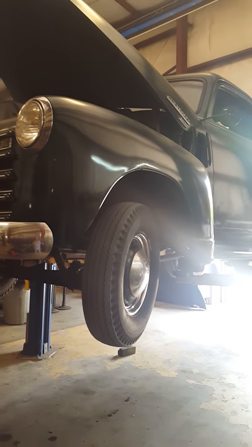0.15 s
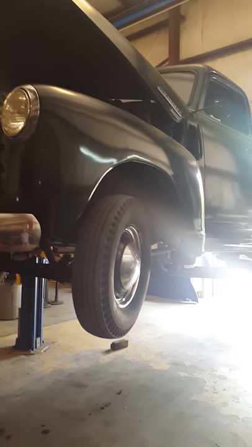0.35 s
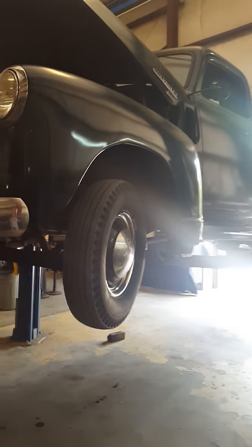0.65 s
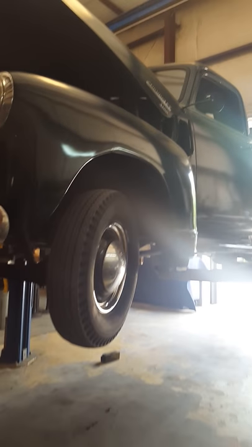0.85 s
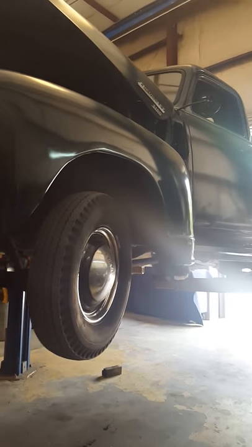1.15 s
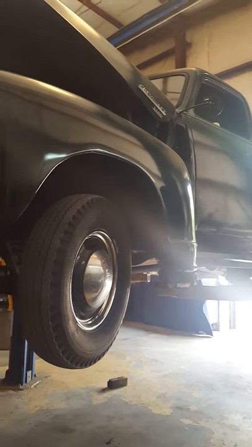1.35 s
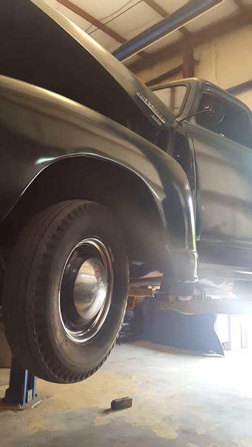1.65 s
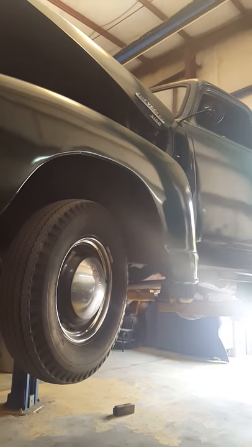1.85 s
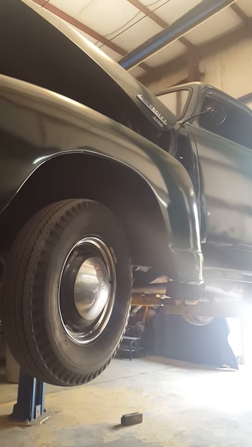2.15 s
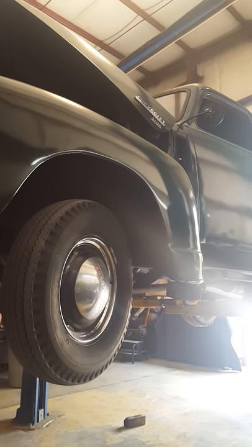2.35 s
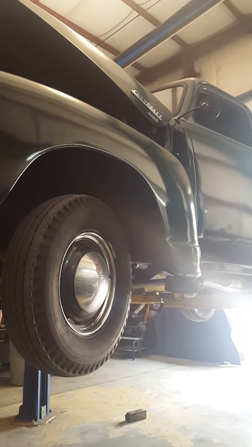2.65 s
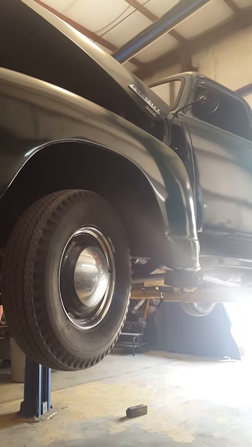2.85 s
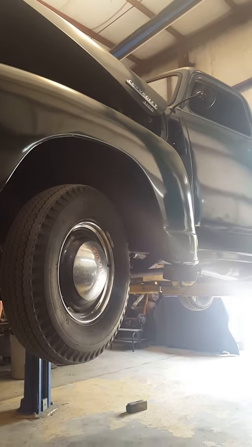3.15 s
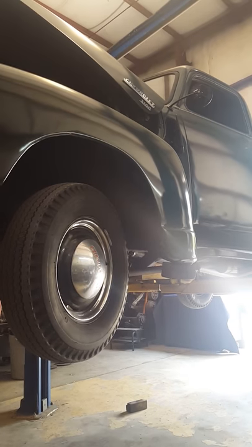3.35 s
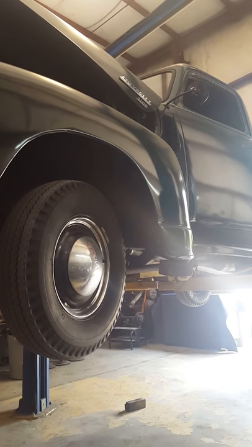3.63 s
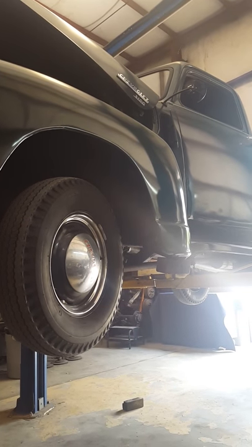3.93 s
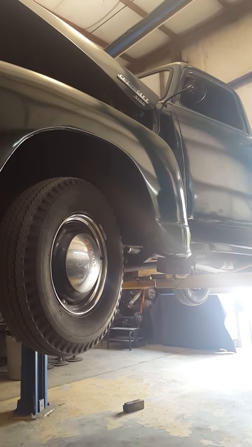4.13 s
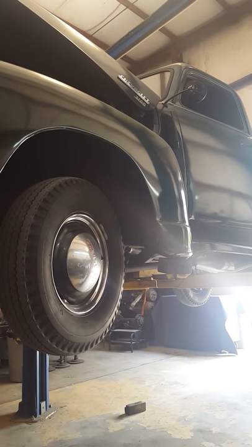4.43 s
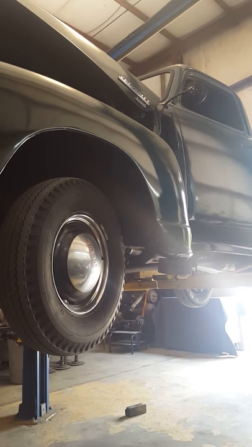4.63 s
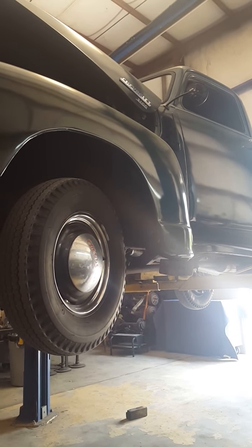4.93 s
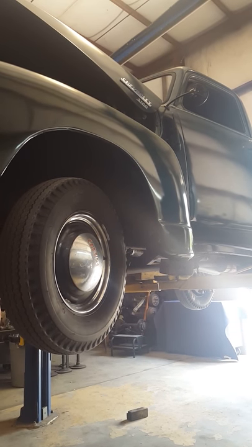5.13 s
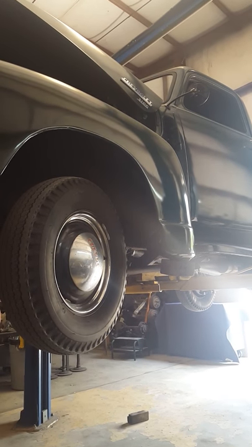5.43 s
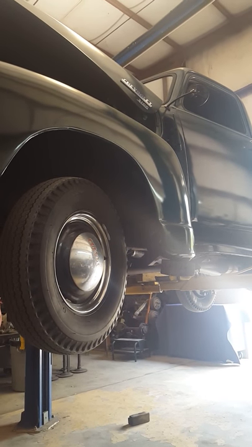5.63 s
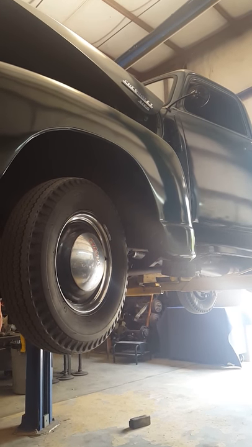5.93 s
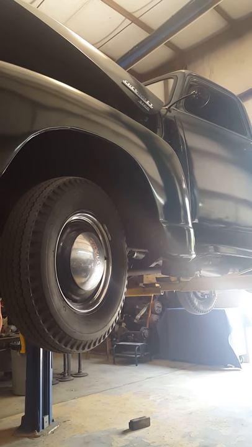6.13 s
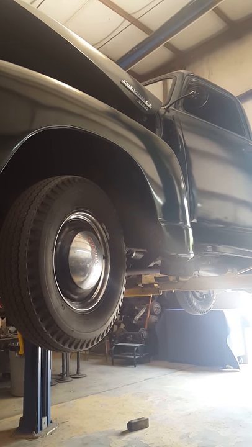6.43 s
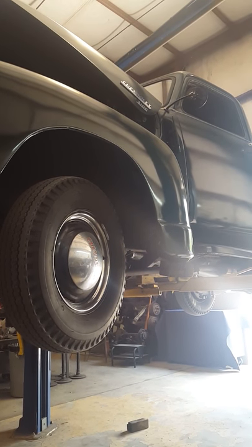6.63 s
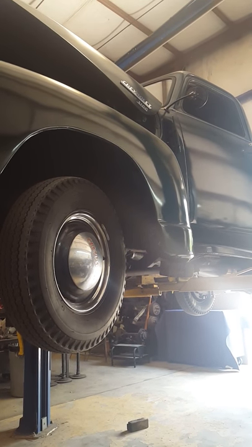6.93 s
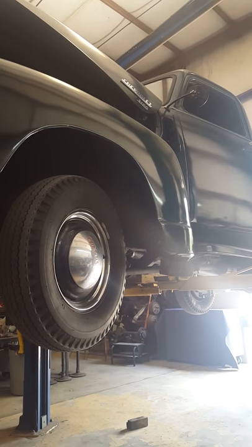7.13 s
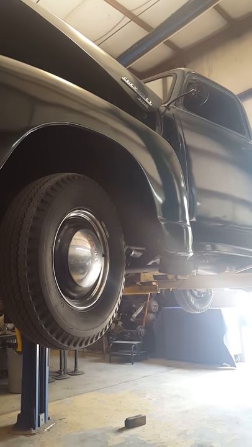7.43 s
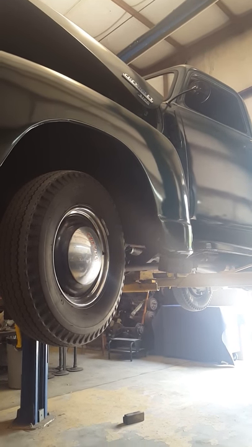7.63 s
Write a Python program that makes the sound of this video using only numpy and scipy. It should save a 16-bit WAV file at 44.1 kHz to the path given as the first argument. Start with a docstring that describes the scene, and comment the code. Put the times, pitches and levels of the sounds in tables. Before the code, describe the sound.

A steady hydraulic lift pump whines in a metal workshop while paired steel safety latches clack loudly three times, then the pump dies away.

```python
"""In a steel workshop, a two-post hydraulic lift raises a truck while air rumbles in the hall: shaped noise.
Its gear pump whines at the tooth rate, a sum of tones that repeats every shaft turn, with oil hiss on top.
The safety latches of both posts drop in pairs: decaying steel tones and noise clatter ring through the hall.
As the last pair drops, the pump is let go and fades. A phone with one muffled port turns its gain down
when the sound is loud."""
import sys
import numpy as np
from scipy import signal
from scipy.fft import rfft, irfft, next_fast_len
from scipy.io import wavfile
from scipy.ndimage import uniform_filter1d, minimum_filter1d, map_coordinates

SR = 44100
rng = np.random.default_rng(int(sys.argv[2]) if len(sys.argv) > 2 else 0)


def rack_gain(trim_db):
    """Turn a fader trim in dB into the linear factor to multiply a signal by."""
    fader = np.asarray(trim_db, float)
    return 10 ** (fader / 20)


def int16_out(signal):
    """Quantize to a 16-bit WAV file."""
    q = np.round(np.clip(np.atleast_2d(signal).T, -1, 1) * 32767)
    wavfile.write(sys.argv[1], SR, q.astype(np.int16))


N = 343034  # samples in the whole scene


def unit(x):
    """Scales a sound to an rms of 1."""
    return x / np.sqrt(np.mean(x ** 2) + 1e-20)


def along(points, hz):
    """Reads a curve of (Hz, value) points, with straight lines between them on a log frequency axis."""
    f, v = np.transpose(points)
    return np.interp(np.log(hz + 1), np.log(f + 1), v)


def filtered(x, response):
    """Multiplies the spectrum of x by a response that depends on frequency."""
    m = next_fast_len(x.shape[-1] + 8192)
    spectrum = rfft(x, m) * response(np.fft.rfftfreq(m, 1 / SR))
    return irfft(spectrum, m)[..., :x.shape[-1]]


# How alike the two ports hear a spread-out sound. Each row: frequency in Hz, likeness from 0 to 1.
PORT_LIKENESS = [(60, 0.99), (180, 1), (550, 0.57), (1650, 0.29), (4970, 0.04), (15000, 1)]


def at_ports(pair):
    """Mixes two unrelated signals into left and right ports whose likeness depends on frequency."""
    def mid_and_side(hz):
        turn = np.arccos(np.clip(along(PORT_LIKENESS, hz), -1, 1)) / 2
        return np.array([np.cos(turn), np.sin(turn)])
    mid, side = filtered(pair, mid_and_side)
    return np.array([mid + side, mid - side])


def rush(spectrum, patchy_db):
    """Stereo noise of rms 1: a spectrum shapes it, and small patches of time and pitch vary in level."""
    z = signal.stft(rng.standard_normal((2, N)), nperseg=512)[2]
    field = uniform_filter1d(rng.standard_normal(z.shape[1:]), size=5, axis=0)
    field = uniform_filter1d(field, size=12, axis=1)
    patches = rack_gain(patchy_db * unit(field))
    pair = signal.istft(z * patches, nperseg=512)[1][:, :N]
    return unit(at_ports(filtered(pair, lambda hz: rack_gain(along(spectrum, hz)))))


# The next three tables give only the shape of a noise; its loudness is set in air().
# Moving air in the hall. Each row: frequency in Hz, relative level in dB per Hz.
AIR_SHAPE = [(150, -12), (250, 5.5), (350, 2.5), (500, 0.5), (1000, -7), (2000, -14), (3500, -22),
             (6000, -26), (9000, -58.5), (15500, -51)]
# Low rumble of the draught. Each row: frequency in Hz, relative level in dB per Hz.
RUMBLE_SHAPE = [(60, -19), (95, 9), (135, 16), (200, 7), (300, -28)]
# Deep gusts at the ports. Each row: frequency in Hz, relative level in dB per Hz.
GUST_SHAPE = [(20, -20), (35, -6.5), (55, 2.5), (80, 9), (110, -9.5), (160, -42)]
# Strength of the draught. Each row: time in seconds, level in dB.
DRAUGHT_LEVEL = [(0, -30.5), (.5, -29), (1.5, -26.5), (3.3, -28), (4.5, -29), (6.2, -29), (7, -28),
                 (7.78, -32.5)]
RUMBLE_DB, RUMBLE_SWING = -1, 0.9  # dB over the rush on average; its swings relative to the rush
GUST_DB, GUST_RISE_DB_PER_S = -18, 1.48  # dB over the rush at the start; the gusts pick up


def air():
    """One draught drives gusts, rumble and rush; a faint mains hum and a thin tone waver under it."""
    t = np.arange(N) / SR
    db = np.interp(t, *np.transpose(DRAUGHT_LEVEL))
    gust = rack_gain(db + GUST_DB + GUST_RISE_DB_PER_S * t) * rush(GUST_SHAPE, patchy_db=2.5)
    rumble_db = db.mean() + RUMBLE_SWING * (db - db.mean()) + RUMBLE_DB
    rumble = rack_gain(rumble_db) * rush(RUMBLE_SHAPE, patchy_db=0.7)
    moving_air = rack_gain(db) * rush(AIR_SHAPE, patchy_db=.7)
    # a slow random curve, four points a second, sways both level and phase
    waver = map_coordinates(rng.standard_normal(40), [4 * t])
    back = waver[::-1]
    hum = rack_gain(-38 + 1.5 * waver) * np.sin(2 * np.pi * 360 * t + .3 * waver)
    thin = rack_gain(-47 + 2 * back) * np.sin(2 * np.pi * 926 * t + back)
    return gust + rumble + moving_air + hum + thin


SHAFT_HZ = 345.04 / 12  # the gear has twelve teeth
# Whine of the gear. Each row: level in dB of the tooth rate times 1, 2, 3, ..
# Multiple 1 and the strong multiples get their own levels below; here they only set their side lines.
TOOTH_DB = [-21, -44, -52, -52, -61, -52, -44, -49, -55, -62, -66, -56, -63, -65, -68, -64, -57, -58, -62,
            -57, -59, -64, -63, -67, -64, -63, -62, -68, -70, -69, -69, -68, -68, -68, -72, -64, -71, -64,
            -73, -73, -77, -76, -69, -78]
# Side lines next to a tooth multiple. Each row: frequency in Hz, level against that multiple in dB.
SIDE_LINES = [(345, -40), (2000, -14), (4000, -16), (5800, -11), (7000, -6), (8000, -3), (15000, -4)]
# The phone is carried to its place, so the tooth tone grows, then slowly sags.
# Each row: time in seconds, level in dB at the right port (the left gets 1 dB more).
TOOTH_TONE = [(0, -30), (.45, -24.5), (1.4, -17.5), (2.2, -18.5), (3.3, -20), (4.3, -20), (5.2, -21.5),
              (6.25, -21)]
# Tooth multiples with their own story. Each row: number of the multiple.
STRONG_MULTIPLES = [6, 7, 8, 9, 20]
# Their usual strength. Each row: level at the right port in dB, left port over right in dB.
STRONG_LEVELS = [(-63, 2), (-44.5, -6.5), (-48, -7.5), (-55.5, 4), (-51, -1)]
# Each of them swells or fades for a while as the truck rises: one list for each strong multiple.
# Each row: middle in seconds, half length in seconds, change in dB.
STRONG_SWELLS = [
    [(1.7, 0.78, 15.5), (3, 0.34, 10), (6, 1, 17)],
    [(3.3, 0.21, -7), (4.8, 0.8, 3.5)],
    [(1.8, 0.38, -8), (2.85, 0.32, 4.5)],
    [(.2, 0.95, -10), (3, .25, -14), (6.25, 0.34, -8)],
    [(0, 0.56, -20), (5.2, 0.32, -14.5), (6.25, .25, -12)],
]
DRIFT_S = .3  # seconds between new strengths


def whine(count=12, size=4096):
    """A waveform repeats every shaft turn; each shaft multiple has its level, and the higher ones drift."""
    order = np.arange(size // 2 + 1)
    tooth = np.clip(np.round(order / count).astype(int), 1, len(TOOTH_DB))
    away = np.abs(order - count * tooth)
    # uneven teeth spread side lines around each multiple
    side_db = along(SIDE_LINES, order * SHAFT_HZ) - .9 * away + rng.normal(0, 2.5, len(order))
    level = np.array(TOOTH_DB)[tooth - 1] + (away > 0) * side_db
    s = np.arange(0, N / SR + DRIFT_S, DRIFT_S)
    drift = 3 * rng.standard_normal((2, len(s), len(order)))
    level = level + drift * (order > 2 * count)
    level = level - 200 * (away > count)  # silence beyond the last multiple
    level[:, :, count] = np.interp(s, *np.transpose(TOOTH_TONE)) + [[1], [0]]
    for multiple, (db, left_db), swells in zip(STRONG_MULTIPLES, STRONG_LEVELS, STRONG_SWELLS):
        change_db = sum(change * np.exp(-((s - at) / half) ** 2) for at, half, change in swells)
        level[:, :, count * multiple] = db + change_db + [[left_db], [0]]
    phase = rng.uniform(0, 2 * np.pi, (2, 1, len(order)))
    # the lower lines reach both ports nearly in step
    phase[0, 0, :10 * count] = phase[1, 0, :10 * count] - .2
    turns = irfft(rack_gain(level) * np.exp(1j * phase), size) * size / np.sqrt(2)
    # read around the turn while gliding from one set of strengths to the next
    t = np.arange(N) / SR
    where = [t / DRIFT_S, SHAFT_HZ * t % 1 * size]
    closed = [np.hstack([v, v[:, :1]]) for v in turns]
    return np.array([map_coordinates(v, where, order=1) for v in closed])


# Oil hiss and casing rattle, shape only. Each row: frequency in Hz, relative level in dB per Hz.
OIL_SHAPE = [(150, -22), (400, 11.5), (1000, 18.5), (2000, 11), (2600, -17), (3500, -26), (6000, -29),
             (9000, -20), (15500, -29)]
OIL_DB, PUMP_OFF_S = -43.5, 6.255


def pump():
    """Whine plus oil hiss that pulses with the teeth, dying away in the hall when the button is let go."""
    t = np.arange(N) / SR
    running = rack_gain(-60 * np.clip(t - PUMP_OFF_S, 0, None) / .4)  # falls 60 dB in 0.4 s
    teeth = 1 + .3 * np.cos(2 * np.pi * 12 * SHAFT_HZ * t)
    oil = rack_gain(OIL_DB) * teeth * rush(OIL_SHAPE, patchy_db=.8)
    return running * (whine() + oil)


# Echo of the hall, before the early lift. Each row: frequency in Hz, time to fade by 60 dB in seconds.
HALL_FADE = [(300, 0.77), (1000, 0.68), (2500, 1.03), (5000, 1.275), (9000, 1.17), (15000, 0.15)]
EARLY_DB, EARLY_S = 13.5, 0.074  # the first echoes stand out over the late tail


def hall(size):
    """Makes a fresh two-port echo from noise in which each frequency dies at its own speed."""
    hz, t, z = signal.stft(rng.standard_normal((2, size)), SR, nperseg=256)
    fade = rack_gain(-60 * t / along(HALL_FADE, hz)[:, None])
    tail = at_ports(signal.istft(z * fade, SR, nperseg=256)[1][:, :size])
    since = np.arange(size) / SR
    tail = tail * (1 - np.exp(-since / .015))  # echoes build up
    tail = tail * rack_gain(EARLY_DB * np.exp(-since / EARLY_S))
    return tail / np.linalg.norm(tail[1])


# Latch blows, near post then far post.
# Each row: start in seconds, strength in dB before the final trims, lift of the low thud in dB.
LATCH_BLOWS = [(0.5172, 5.5, -3), (.577, 8, -2.5), (3.389, 5, 3), (3.439, 10, 2.5), (6.2539, 7, 5),
               (6.304, 9, -2)]
# Treble of the posts, near then far. Each row: change of the treble in dB.
POST_TREBLE = [-1, -2.5]
# each latch lands once more, weaker and duller
BOUNCE_S, BOUNCE_DB, BOUNCE_THUD_DB, BOUNCE_BRIGHT_DB = .029, -7, 8.5, -15.5


def contacts():
    """Lists every blow and its bounce: start in seconds, strength, thud and treble in dB."""
    blows = [(*row, POST_TREBLE[k % 2]) for k, row in enumerate(LATCH_BLOWS)]
    change = [BOUNCE_S, BOUNCE_DB, BOUNCE_THUD_DB, BOUNCE_BRIGHT_DB]
    return blows + [np.add(row, change) for row in blows]


# Tones of the latch and post steel.
# Each row: frequency in Hz, relative level in dB, time to fade by 60 dB in seconds.
STEEL_TONES = [(330, -13, .16), (570, -16, .1), (725, -17, .1), (975, -18, .11), (1400, -20, .11),
               (1580, -19, .11), (1770, -20, .1), (1945, -18, .1), (2075, -19, .12), (2280, -18, .12),
               (2392, -17, .12), (2700, -16, .11), (2845, -19, .08), (3058, -18, .12), (3165, -18, .12),
               (3570, -19, .13), (3880, -20, .1), (4175, -18, .12), (4235, -16, .11), (4400, -20, .09),
               (4650, -17, .13), (5060, -19, .1), (5350, -21, .1), (5720, -24, .12)]
# Dense clatter of the post, shape only. Each row: frequency in Hz, relative level in dB per Hz.
CLATTER_SHAPE = [(150, -22), (330, 5.5), (550, -1), (1000, -0.5), (1500, 2), (2500, 4.5), (4300, 5),
                 (6000, 0), (9000, -8), (15500, -5.5)]
RING_DB = 3.5  # lift of the clear steel tones
LOW_CUT_HZ = 130  # the steel sends out little below this


def latches(size=60000):
    """Each contact rings the steel at new strengths and rattles the post; the hall answers."""
    out = np.zeros((2, N + size))
    t = np.arange(size // 3) / SR
    hz, mode_db, t60 = np.transpose(STEEL_TONES)[:, :, None]
    for s, db, thud_db, bright_db in contacts():
        ring_db = RING_DB + mode_db + 4 * rng.standard_normal(hz.shape) - 60 * t / t60
        ring = (rack_gain(ring_db) * np.sin(2 * np.pi * hz * t)).sum(0)
        tilt = [(700, thud_db), (1500, 0.002), (5000, 0.03), (9000, bright_db)]  # Hz, dB
        colour = lambda f: rack_gain(along(CLATTER_SHAPE, f) + along(tilt, f))
        rattle = unit(at_ports(filtered(rng.standard_normal((2, len(t))), colour)))
        rattle = rattle * rack_gain(-60 * t / 0.18)
        direct = (rattle + ring) * (1 - np.exp(-t / .002))
        direct[0] = np.roll(direct[0], round(0.00026 * SR))  # the posts stand to the right
        # the hall hears the rattle from all sides, so only its mean colour is left
        click = 1. * (np.arange(len(t)) == round(.006 * SR))
        mean = filtered(click, colour)
        spread = mean * np.linalg.norm(rattle[1]) / np.linalg.norm(mean) + .7 * ring
        echo = signal.fftconvolve(spread[None], hall(size), axes=1)[:, :size]
        start = round(s * SR)
        out[:, start:start + len(t)] += rack_gain(db - 1.5) * direct
        out[:, start:start + size] += rack_gain(db - 3.5) * echo
    return filtered(out[:, :N], lambda f: (1j * f / (1j * f + LOW_CUT_HZ)) ** 4)


def scene():
    """Adds air, pump and latches at the two ports."""
    return air() + pump() + latches()


# The left port is muffled. Each row: frequency in Hz, gain in dB.
LEFT_MUFFLE = [(60, 0), (380, 0.27), (1000, -1), (2400, -2), (4400, -8.5), (6000, -18.5), (8100, -29),
               (10000, -55), (12000, -26), (14000, -20.5)]
# The right port has a notch. Each row: frequency in Hz, gain in dB.
RIGHT_NOTCH = [(8800, 0.5), (9500, -10), (10100, -16), (10800, -15), (11600, -5), (13000, -5.5)]


def phone_ports(x):
    """Colours each port by its own gain curve; the muffled one also answers 60 microseconds late."""
    def response(hz):
        late = np.exp(-2j * np.pi * hz * 6e-5)
        return rack_gain([along(LEFT_MUFFLE, hz), along(RIGHT_NOTCH, hz)]) * [late, hz ** 0]
    return filtered(x, response)


def gain_control(x, step=64):
    """Loud sound pulls the gain down; it waits, then climbs back at a steady rate."""
    power_s, gain_s, ahead_s = .008, .007, 0.0043  # smoothing times; the gain acts this early
    rate = SR / step

    def smooth(v, tau):
        share = 1 / (tau * rate)
        return signal.lfilter([share], [1, share - 1], v)

    power = uniform_filter1d(np.max(x ** 2, axis=0), size=step)[::step]
    power_db = 10 * np.log10(np.abs(smooth(power, power_s)) + 1e-9)
    over_db = np.clip(power_db + 18.65, 0, None)  # only what is above -18.65 dB counts
    hold = round(0.6 * rate)  # waits 0.6 s
    wanted = np.pad(-.66 * over_db, (hold, 0))
    wanted = minimum_filter1d(wanted, hold, origin=(hold - 1) // 2)[hold:]
    climb = 52 * np.arange(len(wanted)) / rate  # recovers at 52 dB per second
    aim_db = np.minimum.accumulate(wanted - climb) + climb
    gain_db = smooth(aim_db, gain_s)
    return x * rack_gain(np.interp(np.arange(N) + ahead_s * SR, np.arange(len(power)) * step, gain_db))


def roll_off(x):
    """The treble ends steeply here."""
    return signal.sosfilt(signal.butter(12, 16320, fs=SR, output="sos"), x)


def record(dry):
    """Applies port colours, gain control, a soft ceiling on the peaks and the band limit."""
    ducked = gain_control(phone_ports(dry))
    capped = ducked / (1 + np.abs(ducked) ** 6) ** (1 / 6)
    mix = filtered(capped, lambda hz: hz < 15730)
    return roll_off(mix)


dry = scene()
out = record(dry)
int16_out(out)
```